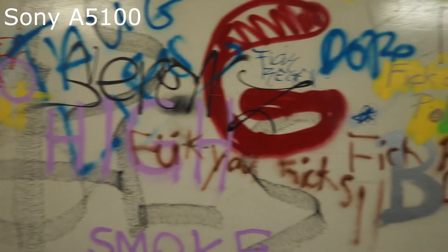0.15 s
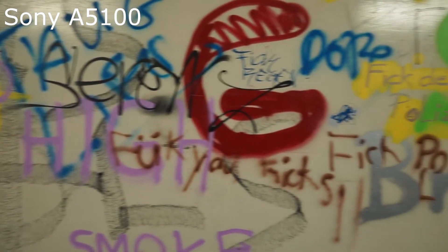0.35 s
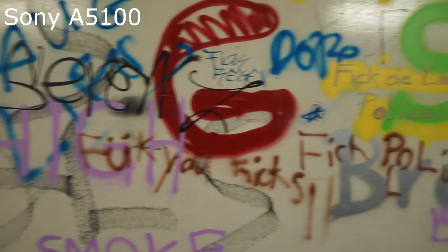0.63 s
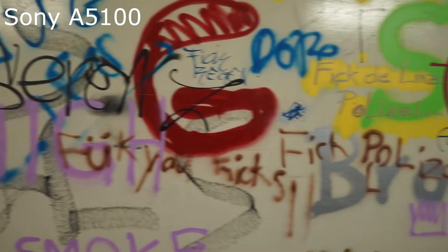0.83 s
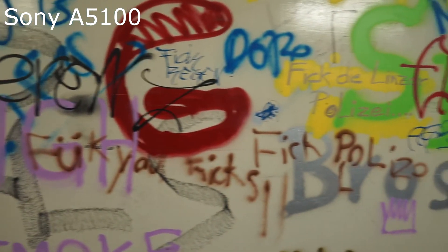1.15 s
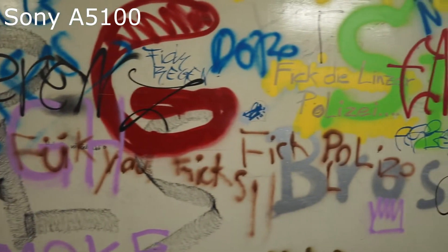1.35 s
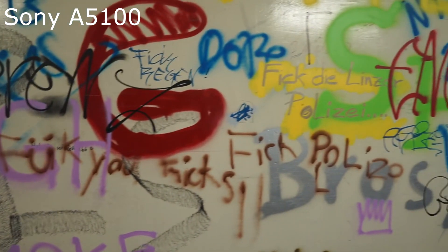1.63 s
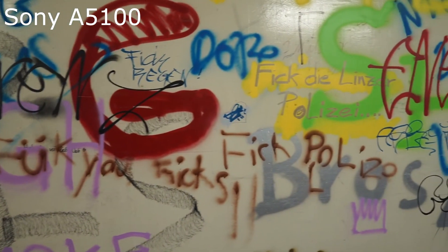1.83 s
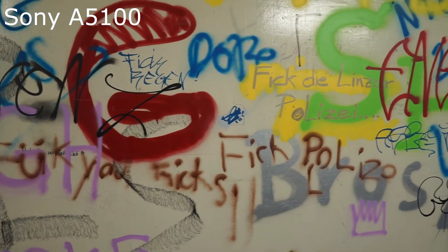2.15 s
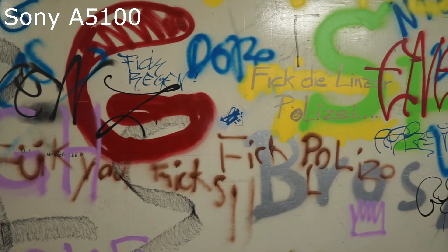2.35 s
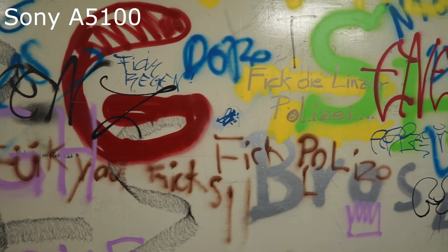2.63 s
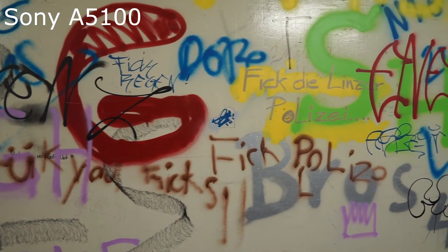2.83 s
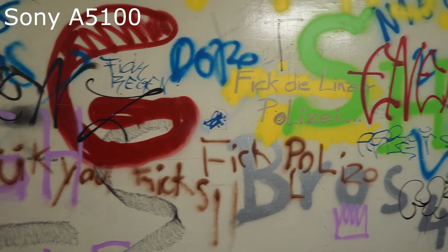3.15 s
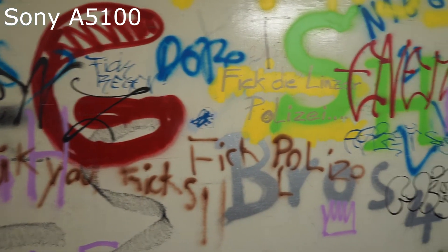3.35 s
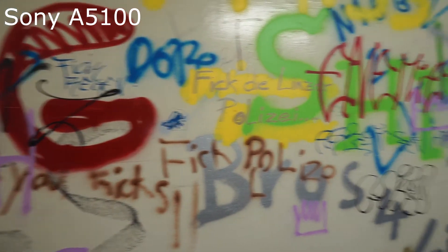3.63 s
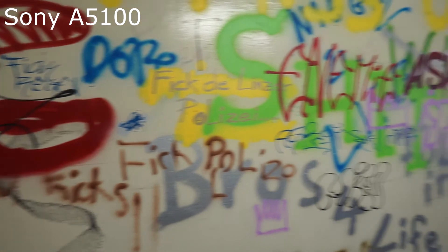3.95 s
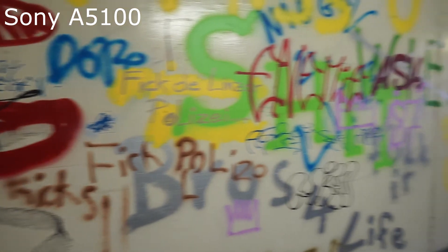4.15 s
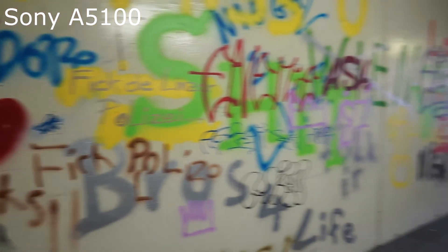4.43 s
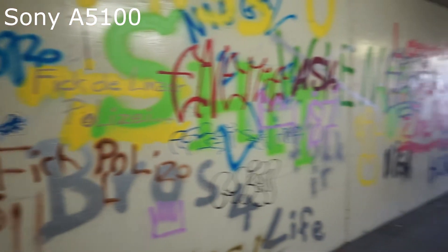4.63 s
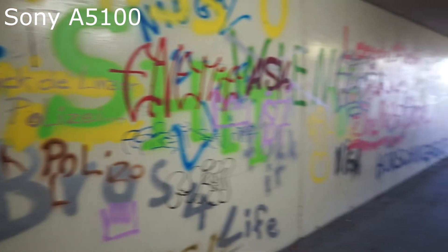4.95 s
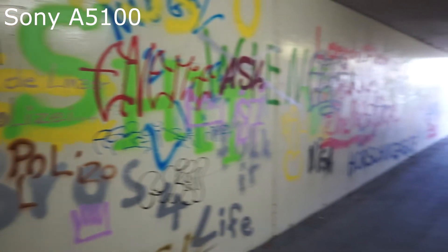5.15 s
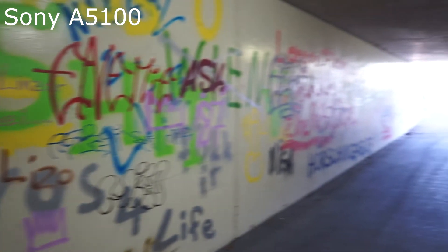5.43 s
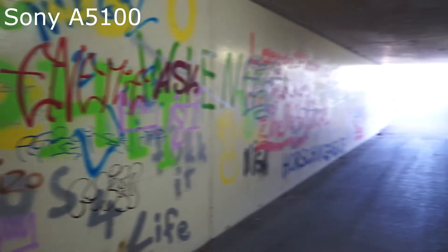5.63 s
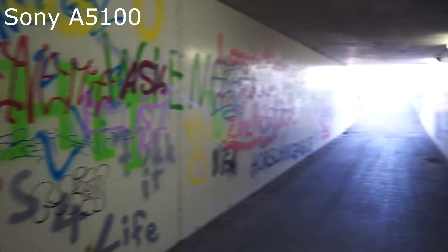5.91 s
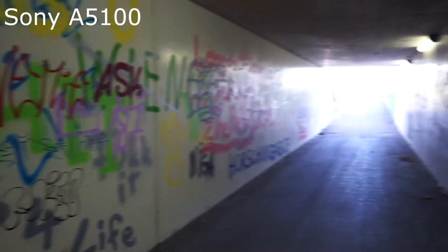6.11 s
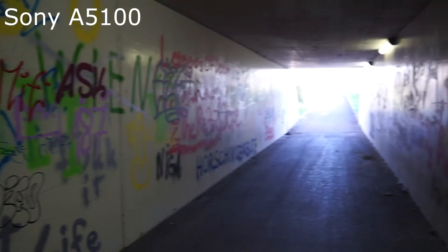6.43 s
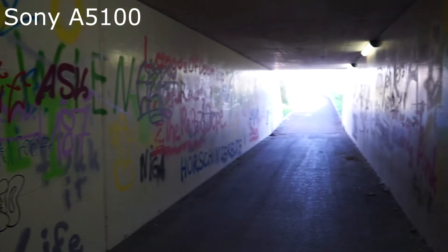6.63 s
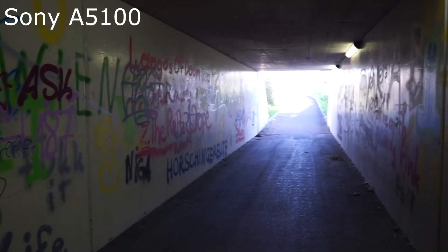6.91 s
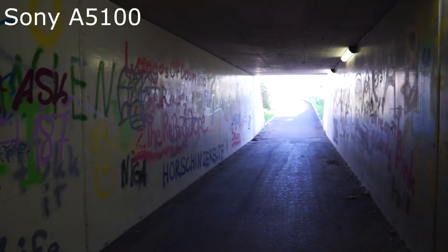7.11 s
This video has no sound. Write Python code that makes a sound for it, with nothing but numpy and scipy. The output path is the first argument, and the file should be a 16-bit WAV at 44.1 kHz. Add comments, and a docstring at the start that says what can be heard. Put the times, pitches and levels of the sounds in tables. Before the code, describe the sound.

Traffic rumbles through a concrete underpass over a steady machine hum, with soft handling bumps and a sharp click from the camera.

```python
"""Handheld camera in an underpass

Traffic rumbles through a concrete tunnel, its tyre roar brightening as the camera pans from the wall to
the mouth. An engine pulls away and booms in the tunnel's resonances; a small machine hums and throbs.
Up close, the hand bumps and clicks the case, a sleeve brushes past and the lens drive ticks faintly."""
import sys
import numpy as np
from scipy import signal
from scipy.fft import rfft, irfft
from scipy.io import wavfile
from scipy.ndimage import uniform_filter1d

SR = 44100
rng = np.random.default_rng(int(sys.argv[2]) if len(sys.argv) > 2 else 0)


def unload_audio(sound):
    """Save the sound as a 16-bit wav file, at the path given as the first command line argument."""
    columns = np.transpose(np.atleast_2d(sound))
    # keep every value between -1 and 1, then stretch to whole-number steps
    steps = np.round(np.clip(columns, -1, 1) * 32767)
    wavfile.write(sys.argv[1], SR, steps.astype(np.int16))


N = 321029
T = np.arange(N) / SR
PAN_S, PAN_HALF_S = 4.7, 1.54  # the camera's turn to the mouth: midpoint, half-length


def amp(db):
    """Decibels to gain."""
    return 10 ** (np.asarray(db) / 20)


def unit_rms(x):
    """Scales to an rms of one."""
    return x / np.sqrt(np.mean(x ** 2) + 1e-20)


def at_hz(points, hz):
    """Reads a curve drawn in straight lines over log frequency."""
    f, value = np.transpose(points)
    return np.interp(np.log(hz + 1), np.log(f + 1), value)


def automation(points):
    """Straight ramps between (time, value) breakpoints."""
    return np.interp(T, *np.transpose(points))


def swell(s, half_s):
    """A smooth rise and fall of height one around time s."""
    return np.exp(-((T - s) / half_s) ** 2)


def fade_in(s, half_s):
    """A smooth step from zero to one around time s."""
    return .5 + .5 * np.tanh((T - s) / half_s)


def gate(start, end, ramp_s):
    """Open between start and end, with soft edges."""
    return fade_in(start, ramp_s) * (1 - fade_in(end, ramp_s))


def drift(rate_hz):
    """A slow random wander of rms one."""
    hz = np.fft.rfftfreq(N, 1 / SR)
    return unit_rms(irfft(rfft(rng.standard_normal(N)) * np.exp(-(hz / rate_hz) ** 2), N))


def ring(blows, modes, rise_s=0.001):
    """Blows excite a set of modes that build quickly and die away."""
    t = np.arange(SR // 10) / SR
    response = sum(amp(db - 60 * t / t60) * np.sin(2 * np.pi * hz * t) for hz, db, t60 in modes)
    attack = 1 - np.exp(-t / rise_s)
    return signal.oaconvolve(blows, (response * attack)[None], axes=1)[:, :N]


# Stereo image of airborne sound, centred lows and wide highs: f/Hz, left-right coherence/0-1
AIR_IMAGE = [(40, 0.86), (75, 1), (130, 1), (340, 0.95), (470, 0.91), (750, 0.77), (1150, 0.61),
             (2400, 0.26), (5000, 0), (10600, 0.14)]
def noise(spectrum, tilt=None, patchy_db=0, image=AIR_IMAGE, lag_s=0):
    """Stereo noise of rms one with drifting patches of colour; tilt is a moving slope in dB/octave."""
    size, hop = 2048, 512
    frames, hz = N // hop + 5, np.fft.rfftfreq(size, 1 / SR)
    a, b, c, d, patches = rng.standard_normal((5, frames, len(hz)))
    patches = unit_rms(uniform_filter1d(uniform_filter1d(patches, size=9, axis=0), size=16, axis=1))
    coherence = at_hz(image, hz)
    left = a + 1j * b
    right = coherence * left + np.sqrt(1 - coherence ** 2) * (c + 1j * d)
    right *= np.exp(-2j * np.pi * hz * lag_s)
    eq_db = at_hz(spectrum, hz) + patchy_db * patches
    if tilt is not None:
        slope = np.interp(np.arange(frames) * hop / SR, T, tilt)
        eq_db += slope[:, None] * np.log2(np.maximum(hz, 300) / 700)
    spectra = (np.array([left, right]) * amp(eq_db)).transpose(0, 2, 1)
    return unit_rms(signal.istft(spectra, nperseg=size, noverlap=size - hop)[1][:, :N])


# Colour of the noise floor: f/Hz, relative level/dB
HISS_EQ = [(1500, -7), (3000, -4), (6400, 5.5), (8500, 4), (11000, -0.5)]
def hiss(level_db=-71):
    """The microphone's own steady hiss."""
    return amp(level_db) * noise(HISS_EQ)


# Colour of the lens whirr: f/Hz, relative level/dB
WHIRR_EQ = [(4000, -30), (5700, -14), (6400, 9), (7000, -13), (8500, -23), (10200, -3), (11000, -12)]
# Squeak cues: t/s, half-length/s, level/dB
SQUEAK_CUES = [(4.607, .04, -75), (4.91, 0.097, -75)]
# The squeaks' narrow, glassy band: f/Hz, relative level/dB
SQUEAK_EQ = [(10400, -40), (10900, 4), (11300, -30)]
def lens_whirr(start_s=4.17, start_db=-74, fade_db_per_s=2):
    """The lens whirrs thinly from the moment the light changes, squeaking twice as it fades."""
    level = fade_in(start_s, 0.02) * amp(start_db - fade_db_per_s * (T - start_s))
    squeaks = sum(amp(db) * swell(s, half) for s, half, db in SQUEAK_CUES)
    return level * noise(WHIRR_EQ, patchy_db=1.5) + squeaks * noise(SQUEAK_EQ)


# Colour of brushing cloth: f/Hz, relative level/dB
CLOTH_EQ = [(400, -12), (900, 1), (1350, 5), (2200, -4), (4000, -15.5), (11000, -34)]
def sleeve(peak_s=3.435, level_db=-50, rise_s=0.31, fall_s=0.13):
    """Cloth brushes past, building slowly and stopping quickly."""
    return amp(level_db) * swell(peak_s, np.where(T < peak_s, rise_s, fall_s)) * noise(CLOTH_EQ)


# Runs where the lens drive works harder: start/s, end/s, body level/dB, top level/dB
DRIVE_RUNS = [(0.524, 1.123, -53, -86), (1.444, 1.61, -53, -81), (1.85, 2.296, -58, -84),
              (2.597, 3.048, -59, -77.5), (3.1, 3.7, -60.5, -78), (4.302, 4.85, -57.5, -81)]
# Hollow body of the camera shell, also rung by the click: f/Hz, relative level/dB, t60/s
SHELL_MODES = [(1481, 9, 0.027), (1560, 5, 0.018), (1658, 10.5, 0.017), (1750, 0.5, 0.028),
               (3273, -10, 0.035), (3710, -13, 0.028)]
# Thin top ring of the lens: f/Hz, relative level/dB, t60/s
TOP_MODES = [(9680, 0, 0.0098), (10100, 0, 0.0085), (11200, -9, 0.0043)]
# Ring of a loose part: f/Hz, relative level/dB, t60/s
RATTLE_MODES = [(1800, -0.5, 0.027), (3405, -17, 0.023)]
def lens_drive(step_hz=50, uneven_db=4, jitter_s=.0009, idle_body_db=-54.5, idle_top_db=-81.5):
    """Each step of the drive ticks against the shell, with a light scrape between; hard runs rattle."""
    power = amp([[idle_body_db], [idle_top_db]]) ** 2
    for start, end, body_db, top_db in DRIVE_RUNS:
        power = power + amp([[body_db], [top_db]]) ** 2 * gate(start, end, ramp_s=0.02)
    body_level, top_level = np.sqrt(power)
    beats = np.arange(.014, N / SR - .02, 1 / step_hz)
    force, *jitter = np.clip(rng.standard_normal((len(beats), 3)), -2, 1.3).T
    step_samples = np.round((beats + jitter_s * np.array(jitter)) * SR).astype(int)
    steps = np.zeros((2, N))
    np.put_along_axis(steps, step_samples, amp(uneven_db * force), 1)
    steps = unit_rms(steps + 0.14 * steps[::-1])  # a little left-right bleed
    scrape = rng.standard_normal((2, N))
    drive = steps + amp(1.5) * scrape
    body = body_level * unit_rms(ring(drive, SHELL_MODES))
    effort = body_level / body_level.max()
    rattle = amp(-56.5) * effort ** 4.2 * unit_rms(ring(drive, RATTLE_MODES))
    top = top_level * unit_rms(ring(steps + amp(-1) * scrape, TOP_MODES))
    return body + rattle + top


# Bright edge of the snap and the nail scratch: f/Hz, relative level/dB
SCRATCH_EQ = [(1000, -12), (2500, 4), (4400, -3), (5500, -11), (6250, -4), (6900, -14), (8300, -4.5),
              (11000, -28)]
# Brief ping of the flicked case: f/Hz, level/dB, t60/s
FLICK_MODES = [(2400, -45, 0.018), (3900, -48, .02), (4450, -44, .011)]
def case_clicks(click_s=3.8733, click_db=-21, snap_db=-44, flick_s=6.9256, flick_db=-29):
    """The plastic case gives in three quick slips, making one hollow click; later a nail flicks it."""
    slip_times = click_s + .00057 * np.arange(3)
    slips = np.zeros((2, N))
    slips[:, np.round(slip_times * SR).astype(int)] = [.6, 1, .8]
    click = ring(slips, SHELL_MODES)
    snap = amp(snap_db) * (T > click_s) * np.exp(-abs(T - click_s) / 0.0019)
    age = np.maximum(T - flick_s, 0)
    scratch = amp(flick_db) * (age > 0) * (np.exp(-age / 0.0012) + .12 * np.exp(-age / 0.01))
    ping = sum(amp(db - 60 * age / t60) * np.sin(2 * np.pi * hz * age) for hz, db, t60 in FLICK_MODES)
    return amp(click_db) * click / abs(click).max() + (snap + scratch) * noise(SCRATCH_EQ) + ping


# Dull handling rumble: f/Hz, relative level/dB
GRIP_EQ = [(20, -32), (50, -2.5), (90, -1), (150, -6.5), (220, -15), (330, -28), (450, -30.5), (650, -47),
           (1500, -66)]
# Stereo image of sound carried by the case: f/Hz, left-right coherence/0-1
CASE_IMAGE = [(40, 0.79), (90, 0.82), (150, 0.74), (230, .35), (500, .3)]
# Shifts of the grip: start/s, end/s, level/dB
GRIP_SHIFTS = [(0.032, 0.954, -42.5), (1.647, 2.252, -40.5), (2.267, 2.695, -36), (2.858, 3.526, -32),
               (3.676, 4.02, -38), (5.562, 5.78, -35.5), (6, 6.12, -38)]
# Soft bumps of the hand: t/s, level/dB, half-length/s
BUMP_CUES = [(0.068, -25.5, .005), (.2, -25, 0.0066), (0.488, -31, .015), (0.828, -13.5, 0.0063),
             (1.923, -16, 0.0064), (2.625, -22.5, 0.0038), (2.659, -24, 0.0077), (2.98, -21, 0.0083),
             (3.095, -23, 0.0078), (3.153, -23.5, .01), (3.213, -21.5, 0.0054), (3.483, -26.5, 0.016),
             (3.699, -27, .008), (3.942, -26, 0.013), (5.613, -26.5, 0.0089), (7.243, -25, 0.0069)]
def hand(rest_db=-61, slip_db=-15.5, rock_hz=149, knock_hz=350, knock_s=0.0022, lag_s=0.00093):
    """The grip rumbles through the case; each bump rocks it briefly, and short hard ones also knock."""
    t = T - np.array([[-.5], [.5]]) * lag_s  # the case shakes the right microphone later
    shifting = sum(amp(db) ** 2 * gate(start, end, ramp_s=0.049) for start, end, db in GRIP_SHIFTS)
    slipping = sum((amp(db + slip_db) * swell(s, half_s=.045)) ** 2 for s, db, _ in BUMP_CUES)
    grip_level = np.sqrt(amp(rest_db) ** 2 + shifting + slipping)
    out = grip_level * noise(GRIP_EQ, patchy_db=1.5, image=CASE_IMAGE, lag_s=.0009)
    for s, db, half_s in BUMP_CUES:
        near = abs(T - s) < 4 * half_s
        age = t[:, near] - s
        hardness = 0.0061 / half_s
        hz = rock_hz * hardness ** 0.45  # longer bumps sit lower
        rock = np.exp(-(age / half_s) ** 2) * np.sin(2 * np.pi * hz * age)
        knock = np.exp(-(age / knock_s) ** 2) * np.sin(2 * np.pi * knock_hz * age)
        out[:, near] += amp(db) * (rock + amp(-8) * hardness ** 2 * knock)
    return out


# Partials of the hum: multiple of the turning rate, level/dB
HUM_PARTIALS = [(4, -58), (6, -52.5), (8, -44.5), (10, -52.5), (12, -45.5), (14, -53), (16, -49.5),
                (21, -57), (22, -56.5), (23, -52.5), (24, -53), (28, -51)]
def machine_hum(turn_hz=11.573, whine_multiple=26, whine_db=-40.5, turned_away_db=-3):
    """A small machine hums at multiples of its turning rate; the strongest throbs once a turn."""
    angle = 2 * np.pi * (turn_hz * T + 0.0011 * drift(0.79))
    tones = sum(amp(db + 0.39 * drift(1.9)) * np.cos(round(k) * angle + rng.uniform(0, 2 * np.pi))
                for k, db in HUM_PARTIALS)
    throb = 1 + 0.56 * np.cos(angle + 1.1)
    level = amp(whine_db + turned_away_db * fade_in(PAN_S, PAN_HALF_S))
    whine = level * throb * np.cos(whine_multiple * angle + np.array([[-.11], [.11]]))
    return np.sqrt(2) * (tones + whine) * amp([[-.4], [.4]])


# The engine's climbing firing rate: t/s, f/Hz
ENGINE_REVS = [(4.9, 68.27), (5.3, 72.3), (5.65, 78.5), (6.2, 93.7), (6.4, 95.2), (6.65, 96.6), (7, 102.5),
               (7.28, 110.8)]
# Boomy tunnel resonances: f/Hz, half-width/Hz, level over the direct tone/dB
TUNNEL_MODES = [(74.4, 2.8, 4.5), (96.4, 2.25, 9.5), (111.2, 3.47, 11)]
def engine(firing_db=-47, octave_db=-47.5):
    """A vehicle pulls away; its firing tone booms whenever it crosses a resonance of the tunnel."""
    hz = automation(ENGINE_REVS)
    angle = 2 * np.pi * np.cumsum(hz * (1 + 0.0028 * drift(5.6))) / SR
    boom = 1 + sum(amp(db) * np.exp(-((hz - mode_hz) / width) ** 2)
                   for mode_hz, width, db in TUNNEL_MODES)
    tones = amp(firing_db) * boom * np.sin(angle) + amp(octave_db) * np.sin(2 * angle)
    return np.sqrt(2) * tones * amp(0.74 * drift(7)) * fade_in(ENGINE_REVS[0][0], .2)


# Low traffic bed carried by the tunnel: f/Hz, relative level/dB
RUMBLE_EQ = [(12, -36), (25, -21), (42, -4), (54, -12.5), (70, 4.5), (110, -5.5), (170, -2.5), (230, -4),
             (290, -6.5), (350, -12), (450, -29), (800, -52.5)]
# Fader ride on that bed: t/s, level/dB
RUMBLE_RIDE = [(0, -43), (1.3, -42.5), (4.2, -39.5), (5.1, -41.5), (5.9, -39), (7.28, -38)]
# Car passes at the mouth: t/s, half-length/s, drone level/dB, tyre level/dB
CAR_PASSES = [(4.8, .36, -46, -57), (6.248, 0.57, -47, -46.5), (7.21, 0.34, -44, -43.5)]
# Hollow drone under each pass: f/Hz, relative level/dB
DRONE_EQ = [(180, -42), (240, 3), (300, -13.5), (350, 5.5), (385, 1), (430, -2.5), (520, -13), (900, -49)]
# Tyre roar from the mouth: f/Hz, relative level/dB
TYRE_EQ = [(100, -20.5), (250, 2), (370, 1), (470, 1), (650, 0.5), (900, 1.5), (1250, -2.5), (1500, -3),
           (1850, -7), (2400, -9), (3300, -16.5), (4600, -22), (7000, -27.5), (11000, -42)]
def traffic(wall_db=-49, mouth_boost_db=8, wall_tilt=-1.41, mouth_lift=1.64, treble_late_s=0.82):
    """Rumble fills the tunnel; tyre roar opens up with the pan; passing cars add roar and a drone."""
    rumble = amp(automation(RUMBLE_RIDE)) * noise(RUMBLE_EQ, patchy_db=0.5)
    drone = sum(amp(db) * swell(s, half) for s, half, db, _ in CAR_PASSES) * noise(DRONE_EQ)
    near = sum(amp(db) * swell(s, half) for s, half, _, db in CAR_PASSES)
    far = amp(wall_db + mouth_boost_db * fade_in(PAN_S, PAN_HALF_S))
    # Treble beams straight down the tunnel, so it comes round later.
    tilt = wall_tilt + mouth_lift * fade_in(PAN_S + treble_late_s, PAN_HALF_S)
    roar = np.hypot(far, near) * amp(0.84 * drift(2.4)) * noise(TYRE_EQ, tilt, patchy_db=1.07)
    return (rumble + drone) * amp([[-.3], [.3]]) + roar * amp([[-.8], [.8]])


def scene():
    """The tunnel ambience, mixed with the camera's own small noises."""
    tunnel = traffic() + engine() + machine_hum()
    return tunnel + hand() + sleeve() + lens_drive() + lens_whirr() + case_clicks() + hiss()


def record(dry, low_cut_hz=24, high_cut_hz=11080):
    """The microphone sheds the deepest bass; the recorder cuts the top off steeply."""
    thinned = signal.sosfilt(signal.butter(2, low_cut_hz, "highpass", fs=SR, output="sos"), dry)
    high_cut = signal.firwin(1023, high_cut_hz, window=("kaiser", 9), fs=SR)
    return signal.oaconvolve(thinned, high_cut[None], "same")


dry = scene()
out = record(dry)
unload_audio(out)
```